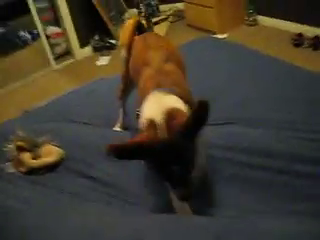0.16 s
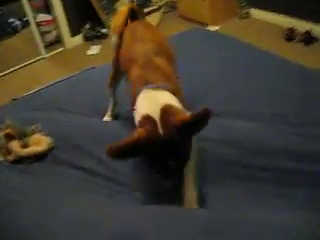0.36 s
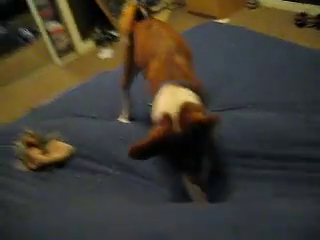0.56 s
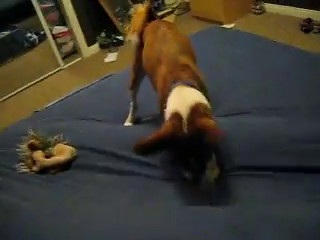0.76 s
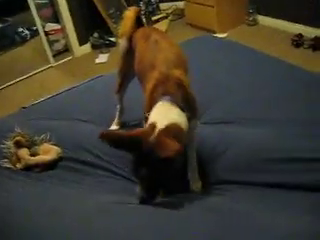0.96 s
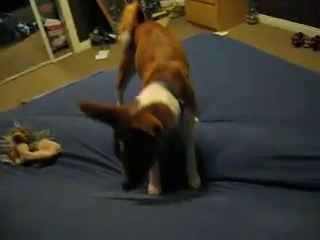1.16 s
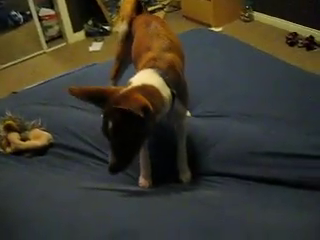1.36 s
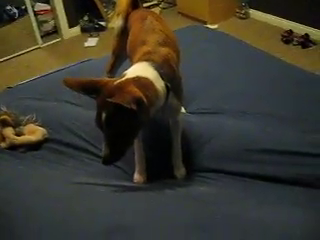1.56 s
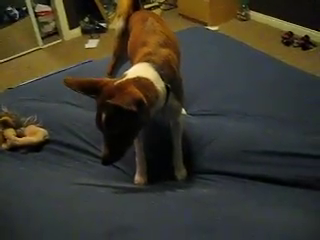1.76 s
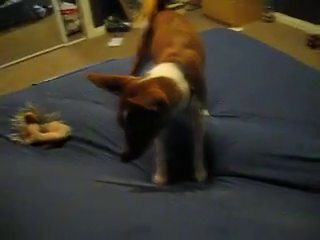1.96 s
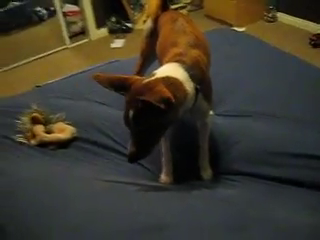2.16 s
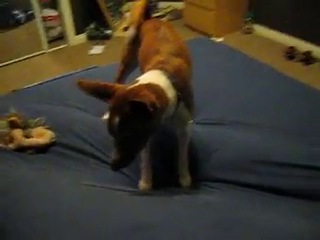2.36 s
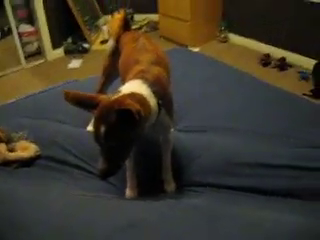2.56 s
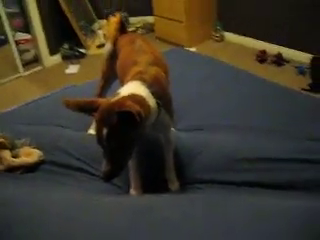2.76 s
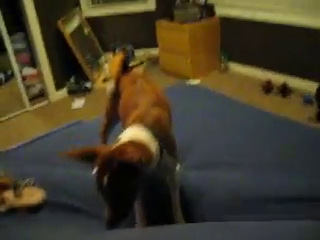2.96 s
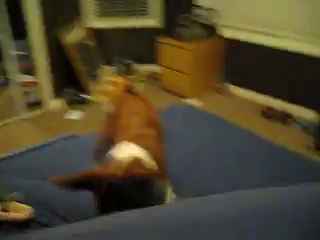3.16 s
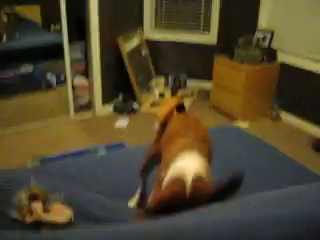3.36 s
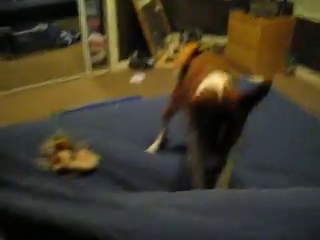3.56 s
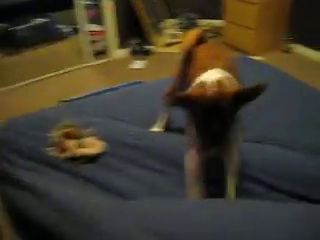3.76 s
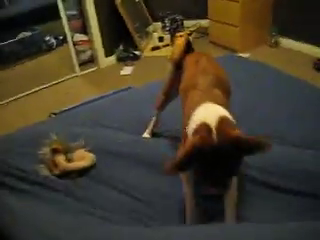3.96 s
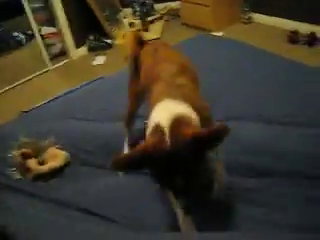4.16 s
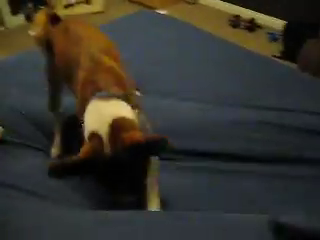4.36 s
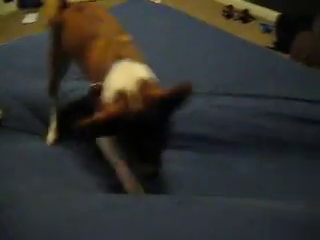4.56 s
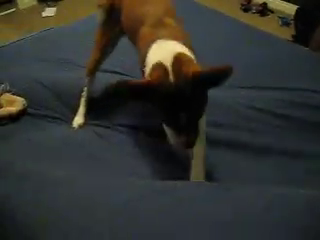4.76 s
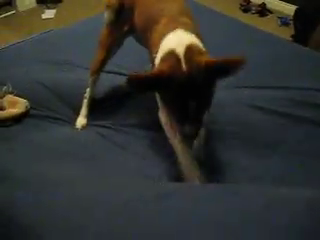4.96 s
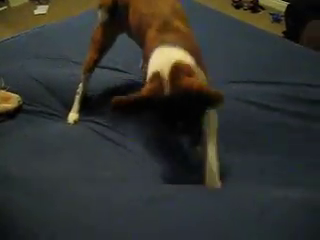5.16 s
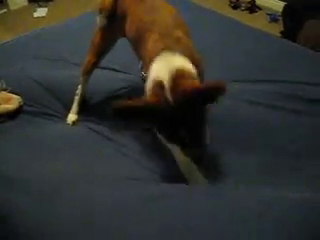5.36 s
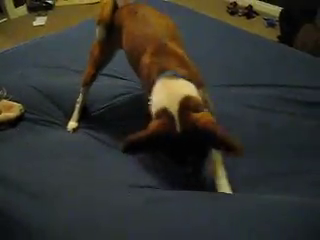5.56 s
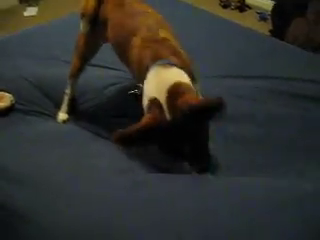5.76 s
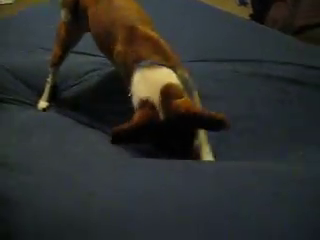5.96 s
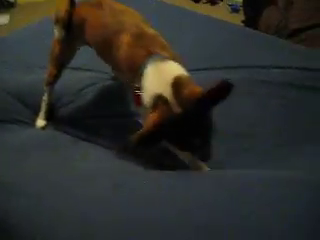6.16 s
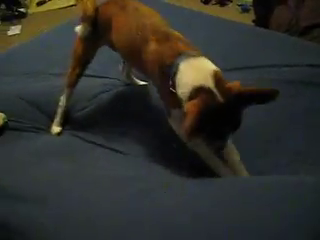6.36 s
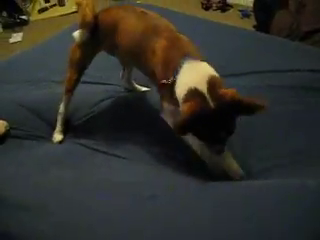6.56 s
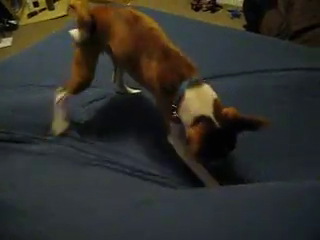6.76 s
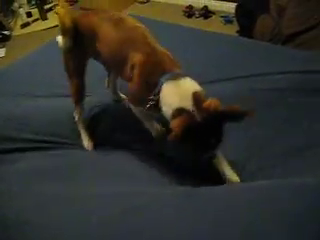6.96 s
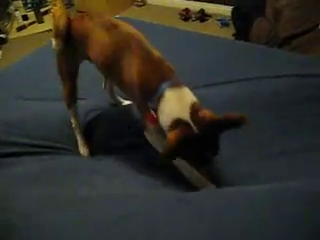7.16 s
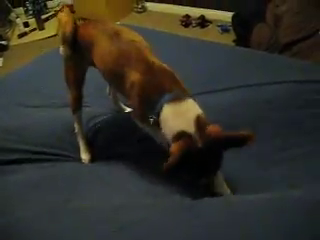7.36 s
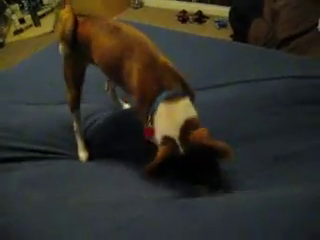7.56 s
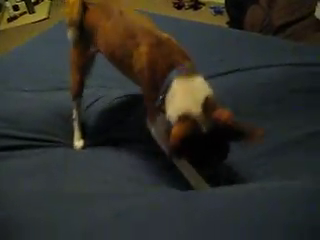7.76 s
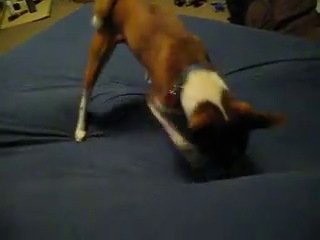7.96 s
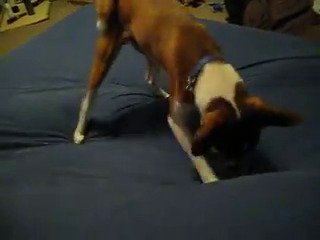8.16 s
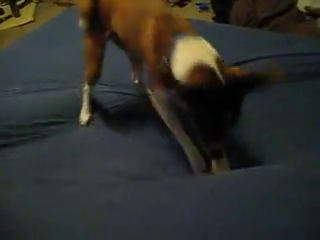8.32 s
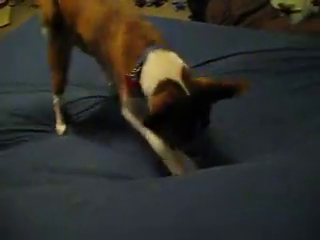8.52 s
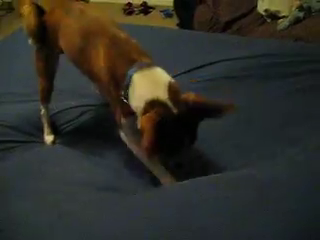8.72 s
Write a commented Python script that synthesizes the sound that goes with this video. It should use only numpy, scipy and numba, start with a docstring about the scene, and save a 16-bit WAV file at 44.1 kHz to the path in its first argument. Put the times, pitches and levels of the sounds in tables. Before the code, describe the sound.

A dog scratches rapidly at bedding, claws zipping over the weave and collar tags clinking, pauses for a hard knock, then digs on.

```python
"""A dog digs at a blanket on a mattress, close to a small camera in a quiet bedroom.
Claws zip over the weave: bands of noise whose pitch follows paw speed. The cloth adds noise as hiss, scrape and rumble.
Metal collar tags clink as sets of fading tones, and threads snag and paws thump as short rings.
Runs of small dull contacts clatter or rub. In a pause the camera is knocked twice and cloth slides near it."""
import sys
import numpy as np
from scipy import signal
from scipy.fft import rfft, irfft, next_fast_len
from scipy.io import wavfile
from scipy.ndimage import uniform_filter1d
from numba import njit

SR = 44100
rng = np.random.default_rng(int(sys.argv[2]) if len(sys.argv) > 2 else 0)


def unload_audio(sound):
    """Save the sound as a 16-bit wav file, at the path given as the first command line argument."""
    columns = np.transpose(np.atleast_2d(sound))
    # keep every value between -1 and 1, then stretch to whole-number steps
    steps = np.round(np.clip(columns, -1, 1) * 32767)
    wavfile.write(sys.argv[1], SR, steps.astype(np.int16))


N = 387638  # length of the scene [samples]

# Paw strokes; the cloth times are stretched separately for each cloth layer:
# (start [s], speeding-up time [s], zip length [s], top zip pitch [Hz], last zip pitch [Hz], zip level [dB],
#  cloth swell [s], hold [s], fade [s], fine hiss level [dB], scrape level [dB], rumble level [dB])
STROKES = [(0.021, 0.0466, .2, 4730, 3450, -37, 0.062, 0.023, 0.096, -37.5, -31.5, -43),
           (0.22, 0.066, 0.13, 5680, 4300, -29.5, 0.058, 0.0099, .14, -39, -31.5, -41),
           (0.456, 0.057, 0.16, 4120, 3500, -45, 0.064, .005, .11, -36, -33, -46),
           (0.653, 0.107, 0.11, 5740, 5500, -30.5, 0.086, .005, 0.15, -38, -35.5, -42.5),
           (3.284, 0.088, 0.16, 4600, 4500, -41, 0.056, 0.067, 0.057, -47, -34, -43),
           (3.442, 0.086, .13, 6400, 5570, -34, 0.063, 0.0088, 0.31, -42.5, -36.5, -41),
           (3.874, 0.064, 0.13, 6460, 5530, -32, 0.044, 0.044, .09, -39.5, -36, -42.5),
           (4.032, 0.05, 0.12, 5700, 5140, -33, 0.049, 0.053, 0.077, -40, -36.5, -37.5),
           (4.215, 0.064, .12, 6950, 5500, -33.5, 0.05, 0.026, 0.094, -39.5, -30, -37),
           (4.395, .042, 0.13, 4700, 4500, -35, 0.038, 0.018, .26, -42, -37, -41),
           (4.613, 0.069, 0.19, 6250, 4000, -29, 0.078, .005, .09, -38, -31.5, -39),
           (4.82, 0.035, .21, 4730, 4300, -37.5, 0.072, 0.011, 0.11, -39, -38.5, -42),
           (5.031, 0.069, .18, 6800, 3800, -28, 0.062, .045, 0.086, -39, -33, -40.5),
           (5.277, .035, 0.067, 6040, 5000, -40, 0.039, 0.039, 0.054, -39, -42, -39),
           (5.436, 0.11, 0.16, 5670, 4500, -34.5, 0.065, 0.0045, .11, -40, -26.5, -39.5),
           (5.623, 0.065, 0.17, 4960, 4600, -35, 0.036, 0.069, .09, -43.5, -40, -46),
           (5.838, 0.059, 0.13, 6200, 5970, -31.5, 0.028, 0.04, 0.082, -42, -32, -41.5),
           (6.031, 0.081, 0.16, 5460, 5000, -38.5, 0.078, .005, 0.096, -39.5, -35.5, -41.5),
           (6.27, 0.06, 0.21, 4200, 3000, -33, 0.043, 0.095, 0.11, -43, -37, -40),
           (6.505, 0.042, .12, 5100, 4520, -39.5, 0.048, 0.046, 0.095, -40.5, -39, -46),
           (6.738, .025, 0.04, 3700, 3770, -48, 0.027, .01, .04, -50, -50, -48.5),
           (6.779, 0.053, 0.15, 3570, 4030, -36.5, .047, 0.093, 0.09, -40, -35.5, -39.5),
           (7.035, .037, 0.19, 5530, 1800, -42, 0.064, 0.0085, 0.1, -37, -36.5, -46),
           (7.258, 0.036, 0.072, 5470, 5950, -38, 0.054, .005, 0.13, -37, -32, -37.5),
           (7.496, 0.047, 0.046, 5000, 5000, -46, 0.064, .005, 0.071, -41.5, -36.5, -49),
           (7.733, .04, .08, 5600, 5100, -39, 0.044, .03, .1, -41, -33.5, -44.5),
           (8.002, 0.047, .13, 4950, 4500, -35.5, 0.05, .005, 0.12, -41, -37, -40),
           (8.217, .075, 0.14, 4760, 4600, -36.5, 0.051, .01, 0.14, -42.5, -34, -44.5),
           (8.467, 0.0645, 0.12, 4400, 4330, -36.5, 0.064, .01, .14, -39.5, -38, -41.5),
           (8.708, 0.0535, 0.092, 4940, 4850, -30.5, .03, 0.051, .1, -41, -36, -36)]


def undb(db):
    """Turn decibels into a gain."""
    return 10 ** (np.asarray(db) / 20)


def band_level(x, lo_hz, hi_hz):
    """Scale a sound so that its part inside a band has rms 1."""
    band_filter = signal.butter(4, [lo_hz, hi_hz], "band", fs=SR, output="sos")
    part = signal.sosfilt(band_filter, x)
    return x / np.sqrt(np.mean(part ** 2))


def colour(x, points):
    """Filter a sound with the gain curve drawn through (frequency [Hz], level [dB]) points."""
    size = next_fast_len(N)
    hz, db = np.transpose(points)
    bin_hz = np.arange(size // 2 + 1) * SR / size
    gain = undb(np.interp(np.log(bin_hz + 1), np.log(hz), db))  # + 1 avoids log(0)
    return irfft(rfft(x, size) * gain, size)[:N]


@njit
def svf(x, hz, q):
    """Filter with a moving centre: returns the band round it (gain 1) and what lies below it."""
    band, low = np.empty(len(x)), np.empty(len(x))
    b, l = 0., 0.  # the filter's two memories
    for i in range(len(x)):
        g = np.tan(np.pi * hz[i] / SR)
        v = (b + g * (x[i] - l)) / (1 + g * (g + 1 / q))
        band[i] = v / q
        low[i] = l + g * v
        b, l = 2 * v - b, l + 2 * g * v
    return band, low


def add(track, s, sound):
    """Mix a sound in at a time [s]."""
    i = int(s * SR)
    track[i:i + len(sound)] += sound[:N - i]


def decay(t, t60):
    """Fade that falls by 60 dB in t60 seconds."""
    return np.exp(-np.log(1000) * t / t60)


def ring(hz, t60, phase=0.):
    """One tone of a struck body, dying away."""
    t = np.arange(int(t60 * SR)) / SR
    return np.sin(2 * np.pi * hz * t + phase) * decay(t, t60)


def burst(noise, hz, q, t60):
    """A short decaying crack of noise round a pitch, peak 1."""
    t = np.arange(len(noise)) / SR
    x = svf(noise * decay(t, t60), np.full(len(t), 1. * hz), q)[0]
    return x / np.abs(x).max()


def blow(hz, t60):
    """A short ring of a small body, which radiates little below its pitch; peak 1."""
    x = np.append(ring(hz, t60), np.zeros(300))  # room for the filter to settle
    x = signal.lfilter(*signal.butter(2, 0.5 * hz, "high", fs=SR), x)
    return -x / np.abs(x).max()


def flicker(rate):
    """Random levels, one every 1 / rate seconds, joined by straight slides; spread near 1."""
    size = int(SR / rate)
    steps = np.repeat(rng.standard_normal(N // size + 1), size)
    return 1.16 * uniform_filter1d(steps, size)[:N]


def fibres(grain_db):
    """Dense slips of single fibres: noise whose grains differ in size."""
    size = undb(grain_db * np.minimum(rng.exponential(size=N // 16 + 1), 4.5))
    x = rng.standard_normal(N) * np.repeat(size, 16)[:N]  # 16 samples a grain
    return x / x.std()


def patchy(x, patchy_db, rate):
    """Each half octave flickers alone, as claws catch and lose different threads."""
    out = np.zeros(N)
    for hz in 250 * 2 ** np.arange(0, 5.6, .5):
        out += undb(patchy_db * flicker(rate)) * svf(x, np.full(N, hz), 2.5)[0]
    return out


def room():
    """Still air and microphone hiss: steady noise, strongest in the bass."""
    # Spectrum of the quiet room: (frequency [Hz], level per Hz [dB])
    room_spectrum = [(15, -23), (35, -6.5), (70, -2.5), (110, -3), (150, -3), (330, -6.5), (500, -10),
                     (900, -4), (1500, -12.5), (3000, -14), (6000, -20), (9000, -25), (11000, -24),
                     (13500, -32), (16500, -38)]
    room_db = -50.5
    x = colour(rng.standard_normal(N), room_spectrum)
    return undb(room_db) * x / x.std()


def rattles():
    """Uneven runs of small contacts, each ringing one heavily damped resonance."""
    # Quick runs of small dull contacts: clatter of tags or strap, and one rub of cloth:
    # (start [s], length [s], pitch [Hz], ring t60 [s], level at start [dB], level at end [dB])
    contact_runs = [(2.365, 0.048, 2270, 0.0055, -38, -30), (1.921, 0.031, 3600, 0.0034, -51, -38),
                    (2.424, 0.15, 3340, 0.0023, -48, -45), (2.615, 0.029, 1300, 0.0047, -49, -47),
                    (4.345, 0.14, 4650, 0.0049, -23.5, -45), (5.945, 0.11, 4620, 0.004, -31, -45),
                    (6.344, 0.1, 3500, 0.0054, -33, -52)]
    hits_per_s = 1100  # on average
    out = np.zeros(N)
    for s, length, hz, t60, start_db, end_db in contact_runs:
        size = int(length * SR)
        struck = rng.random(size) < hits_per_s / SR
        hits = struck * (rng.random(size) - .5)
        hits = hits / hits.std() * undb(np.linspace(start_db, end_db, size))
        body = np.convolve(ring(hz, t60), ring(hz, 0.4 * t60))
        body = body / np.sqrt(np.sum(body ** 2))
        add(out, s, np.convolve(hits, body))
    return out


def thumps():
    """Soft blows: a cycle or two of the padded body, with a harder overtone."""
    # Paw thumps on the mattress and knocks on the camera: (time [s], main peak level [dB], pitch [Hz])
    soft_blows = [(0.592, -29, 514), (2.086, -22, 164), (2.0994, -22, 85.6), (2.099, -23, 146),
                  (2.1012, -10.5, 467), (2.4053, -16, 835), (2.412, -23, 810), (2.673, -25, 207),
                  (2.7376, -27.5, 480), (2.7743, -26.5, 248), (2.7978, -27, 304), (2.891, -24.5, 330),
                  (2.898, -28, 300), (3.0355, -29.5, 206), (4.282, -28, 540), (4.471, -19.5, 308),
                  (4.6815, -20, 322), (4.8675, -32, 418), (5.211, -32.5, 130), (5.665, -30, 252),
                  (6.392, -33, 470), (6.562, -37, 226), (6.848, -26, 506), (6.9345, -29, 570),
                  (7.2722, -24.5, 556), (8.078, -28, 277), (8.5835, -31, 445)]
    out = np.zeros(N)
    for s, db, hz in soft_blows:
        add(out, s, undb(db) * blow(hz, 4.3 / hz))
        add(out, s, undb(db - 7.5) * blow(2.17 * hz, 3.0 / hz))
    return out


def snaps():
    """A few cycles of a small stiff body, with a treble crack of noise."""
    # Claws snagging a thread and hard taps; the ring takes 1.53 times the listed cycles to fall 60 dB:
    # (time [s], ring peak level [dB], pitch [Hz], ring length [cycles], crack peak level [dB])
    hard_taps = [(0.4438, -3.5, 1630, 7.8, -7), (0.4441, -2, 3700, 8.7, -3), (0.505, -13.5, 2410, 5.7, -21),
                 (.5047, -5, 7400, 13, -14), (.7768, -22, 1400, 1.7, -11), (1.8837, -19, 2120, 6, -42),
                 (1.8827, -28, 4000, 5, -45), (1.919, -21.5, 2170, 4.6, -38),
                 (2.0853, -16, 1110, 0.57, -36), (2.0878, -13.5, 776, 1.6, -24),
                 (2.0998, -17, 1130, 0.54, -17.5), (2.683, -50, 9000, 2, -33),
                 (2.4051, -8.5, 1760, 2.3, -31), (4.337, -11, 4560, 20, -13.5),
                 (4.6338, -15, 2210, 2.3, -9), (5.6912, -5, 6450, 7.1, -27),
                 (5.9345, -16.5, 4000, 8.4, -32), (6.333, -9.5, 3820, 4, -22), (7.129, -16, 2000, 1.9, -34),
                 (7.1476, -13, 2980, 1.4, -34), (7.1562, -13.5, 1400, 1.1, -38), (7.272, -24, 980, 10, -36),
                 (5.811, -27, 980, 5, -42), (5.845, -24, 895, 4.5, -45), (7.72, -27.5, 684, 5.1, -42),
                 (8.71, -23, 849.7, 6, -44)]
    out = np.zeros(N)
    for s, db, hz, cycles, crack_db in hard_taps:
        noise = rng.standard_normal(500)
        add(out, s, undb(db) * blow(hz, 1.53 * cycles / hz))
        add(out, s, undb(crack_db) * burst(noise, 6500, 0.25, 0.011))
    return out


def tags():
    """Each clink starts every tone of the metal afresh, with a tick; close pairs of tones beat."""
    # Tags meeting; t60 is that of the 10.8 kHz ring, short when fur damps the tags:
    # (time [s], 10.8 kHz ring level [dB], then relative to it: 14.8 kHz ring [dB], 7.0 kHz ring [dB],
    #  6.4 kHz ring [dB], tick before a shared boost [dB]; t60 [s])
    clinks = [(0.059, -19.5, -33, -28, -25, -13, 0.12), (0.8, -29, -25, -23, -24, -8, 0.18),
              (0.9157, -9, -39, -30, -17, -24, 0.14), (0.9846, -23, -41, -24, -14, -23, 0.12),
              (1.0529, -29.5, -26, -17, -6, -5, 0.14), (3.2868, -30.5, -17, -24, -8, -8, 0.18),
              (3.3815, -26, -43, -14, -8, -23, 0.15), (4.3357, -21, -23, -27, -26, 6, 0.15),
              (4.3963, -30.5, -23, -23, -20, -5, 0.18), (4.469, -28, -30, -20, -17, -9, 0.18),
              (4.58, -26, -29, -31, -26, -14, 0.08), (4.6336, -12.5, -30, -13, -14, -23, 0.11),
              (5.2329, -35, -21, -29, -25, -13, 0.12), (5.4405, -37, 5, -17, -12, -6, 0.18),
              (5.4818, -29, -25, -21, -18, -6, 0.18), (5.5262, -19.5, -31, -23, -22, -4, 0.13),
              (5.5532, -23, -24, -17, -21, -18, 0.24), (5.691, -12, -30, -13, -21, -5, 0.13),
              (5.7307, -14, -27, -13, -32, -11, 0.12), (5.8745, -29, -24, -11, 0, -6, 0.18),
              (5.9222, -10, -16, -31, -26, -4, 0.24), (6.111, -23.5, -14, -17, -7, -9, 0.18),
              (6.2845, -31, 1, -20, -13, -5, 0.14), (6.332, -19.5, -24, -8.5, -13, -16, 0.17),
              (6.3583, -21.5, -29, -21, -18, -14, 0.1), (6.543, -15, -38, -21, -17, -23, 0.11),
              (6.686, -33.5, -20, -25, -25, -8, 0.1), (6.8193, -26.5, -19, -22, -10, -8, 0.13),
              (6.978, -39, -25, -25, -25, -16, 0.15), (7.2778, -39, -21, -14, -12, -4, 0.18),
              (7.3222, -22, -31, -14, -16, -12, 0.18), (7.551, -16, -14, -35, -20, -24, 0.16),
              (7.824, -29, -25, -25, -25, -16, 0.092), (7.909, -31, -4, -26, -16, -12, 0.14),
              (8.334, -25.5, -30, -34, -25, -16, 0.23), (8.4085, -12, -15, -45, -16, -16, 0.14)]
    # Tones of the tags, in close pairs:
    # (pitch [Hz], partner pitch [Hz], partner level [dB], ring time relative to the first pair [ratio])
    tag_tones = [(10745, 10795, -3, 1), (14745, 14790, -5, .6), (7020, 7050, -9, 1.1),
                 (6340, 6400, -2, .65)]
    detune_hz = 30  # each clink's tones are detuned at random; full range
    tick_boost_db = 7.5
    out = np.zeros(N)
    for s, db, *shares, tick_db, t60 in clinks:
        for (hz, pair_hz, pair_db, life), share_db in zip(tag_tones, [0] + shares):
            chance, detune, pair_detune = rng.random(3) - .5
            pair_gain = undb(pair_db)
            tone = ring(hz + detune_hz * detune, life * t60)
            # the random phase lets the beat start anywhere within a range
            partner = ring(pair_hz + detune_hz * pair_detune, life * t60, 2.3 * chance)
            beat = (tone + pair_gain * partner) / (1 + pair_gain)
            add(out, s, undb(db + share_db) * beat)
        tick = burst(rng.standard_normal(400), 11300, 1.3, 0.0036)
        add(out, s, undb(db + tick_db + tick_boost_db) * tick)
    return out


def dragging():
    """Gains of hiss, scrape and rumble: each movement swells, holds and fades over the settling folds."""
    # Cloth sliding without claws; times are stretched separately for each layer:
    # (start [s], swell [s], hold [s], fade [s], fine hiss level [dB], scrape level [dB], rumble level [dB])
    slides = [(0.575, 0.045, 0.053, 0.069, -47.5, -41.5, -45.5), (0.916, 0.034, .05, .06, -55.5, -53, -59),
              (1.038, .03, .01, 0.087, -53, -57, -59), (1.889, .035, 0.028, 0.0047, -41, -44, -50),
              (2.113, 0.1, 0.19, 0.096, -42, -42.5, -54), (2.423, 0.033, .11, .03, -50.5, -54, -66),
              (3.056, .18, .02, 0.38, -46.5, -40.5, -43), (3.73, 0.062, 0.0044, 0.06, -52, -44, -47),
              (5.81, .012, .005, .03, -54, -35.5, -49), (6.4, .03, .01, .07, -45, -37.5, -47),
              (7.13, .025, .01, .07, -50, -32, -38), (6.236, 0.043, 0.022, .05, -60, -52, -42),
              (7.413, 0.064, 0.064, 0.076, -46.5, -40.5, -53), (7.697, 0.035, .01, .05, -48, -54, -47),
              (7.902, 0.035, 0.036, 0.088, -60, -49, -48.5), (8.4, 0.038, .04, .05, -56, -47, -55)]
    # Folds settling between strokes: (time [s], fine hiss level [dB], scrape level [dB], rumble level [dB])
    settling = [(0, -59, -50, -45), (.2, -68, -59, -49.5), (.9, -62, -54, -54), (1.17, -70, -85, -55.5),
                (1.84, -80, -74, -54), (1.99, -72, -62, -59), (2.09, -56.5, -57, -44.5),
                (2.6, -60.5, -51.5, -46.5), (3.01, -56.5, -58, -48.5), (3.6, -60, -46.5, -44.5),
                (4.6, -50, -44, -45), (5.0, -60.5, -51.5, -52.5), (5.8, -54.5, -52, -48),
                (6.7, -56.5, -57, -49.5), (7.65, -58, -52, -52), (8.2, -57.5, -57, -48.5),
                (8.79, -71, -58, -51)]
    # How hiss, scrape and rumble (one row each) follow a movement:
    # (lead [s], swell time share [ratio], hold share [ratio], fade time share [ratio],
    #  swell curve [exponent], fade curve [exponent])
    follows = [(.002, 1, 0.99, 0.85, 1.67, 1.33), (0.011, 0.76, 0.53, 1.17, 1.83, 0.95),
               (.03, 0.86, .9, 1.64, 1.37, 1.03)]
    edge_db = 20  # a swell starts, and a fade ends, this far under the hold level
    t = np.arange(0, N, 32) / SR  # every 32nd sample is fine enough
    s, *columns = np.transpose(settling)
    power = [undb(2 * np.interp(t, s, levels)) for levels in columns]  # twice the dB gives power
    movements = [(row[0], *row[6:]) for row in STROKES] + slides
    for start, swell, hold, fade, *levels in movements:
        for k, (db, follow) in enumerate(zip(levels, follows)):
            lead, swell_share, hold_share, fade_share, swell_curve, fade_curve = follow
            top = start + swell_share * swell
            hold_end = top + hold_share * abs(hold)
            before = np.maximum(top - t, 0) / (lead + swell_share * swell)
            after = np.maximum(t - hold_end, 0) / (fade_share * fade)
            drop_db = edge_db * (before ** swell_curve + after ** fade_curve)
            power[k] = power[k] + undb(2 * (db - drop_db))
    return [np.interp(np.arange(N) / SR, t, np.sqrt(p)) for p in power]


def strokes():
    """Pitch of threads passing a claw (it follows paw speed) and loudness of the zip."""
    t = np.arange(N) / SR
    marks, zip_gain = [], np.zeros(N)
    for s, rise, length, top_hz, end_hz, db, *_ in STROKES:
        marks += [(s - .035, 4600), (s, 550), (s + 0.68 * rise, 0.812 * top_hz),
                  (s + rise, top_hz), (s + length, end_hz)]
        times = [s, s + 0.23 * rise, s + 0.94 * rise, s + 1.33 * rise, s + length]
        zip_gain += undb(db) * np.interp(t, times, [0, 0.43, 0.88, 0.59, 0.0023])
    s, hz = np.transpose(sorted(marks))
    return np.clip(np.interp(t, s, hz), 300, 7500), zip_gain


def cloth():
    """A narrow zip at the thread rate, scrape below it, fine hiss above and the rumble of the folds."""
    # Spectrum of the fine hiss: (frequency [Hz], level per Hz [dB])
    hiss_spectrum = [(1200, -34), (2500, -1), (5000, -2), (7000, -5.5), (9100, -4), (11400, 3), (13000, -5),
                     (14800, -18), (16500, -23)]
    # Spectrum of the scrape: (frequency [Hz], level per Hz [dB])
    scrape_spectrum = [(400, -15), (900, 0.5), (1500, -1.5), (3000, -2.5), (5000, -2), (7500, 3),
                       (9500, -40)]
    zip_q = 6.5  # sharpness of each of the two filters that shape the zip
    hiss_gain, scrape_gain, rumble_gain = dragging()
    hz, zip_gain = strokes()

    zips = np.zeros(N)
    for speed, db in [(0.99, -0.5), (0.768, -4)]:  # the second claw trails, slower
        wobble_hz = speed * hz * (1 + 0.035 * flicker(45))
        band = svf(fibres(grain_db=1.5), wobble_hz, zip_q)[0]
        band = svf(band, wobble_hz, zip_q)[0]
        even_out = np.sqrt(3000 / hz)  # bands widen with pitch
        zips += undb(db + 2.2 * flicker(70)) * even_out * band
    zips = zips / zips.std()

    scrape = colour(fibres(grain_db=1.5), scrape_spectrum)
    scrape = patchy(scrape, patchy_db=3.5, rate=55)
    for q in (.55, .8, 1.5):
        scrape = svf(scrape, 1.2 * hz, q)[1]  # a slow paw makes little treble
    scrape = band_level(scrape, 1000, 9300)

    hiss = band_level(colour(fibres(grain_db=1.67), hiss_spectrum), 11510, 13300)

    rumble = colour(fibres(grain_db=2.5), [(20, -3.5), (40, -6.5), (90, -8.5), (150, -0.5), (300, 2),
                                           (1000, -2.5), (2000, -7), (4000, -24.0)])
    rumble = band_level(rumble * undb(2.2 * flicker(30)), 140, 1360)
    return zip_gain * zips + scrape_gain * scrape + hiss_gain * hiss + rumble_gain * rumble


def scene():
    """Mix all sources; hard sounds get a short noise tail from the soft room."""
    hard = tags() + snaps() + thumps() + rattles()
    t = np.arange(SR // 5) / SR
    tail = rng.standard_normal(len(t)) * decay(t, 0.064) * (t > .003)
    tail = svf(tail, np.full(len(t), 2500.), 0.65)[1]  # bedding swallows the treble
    hard = hard + undb(-34.5) * signal.fftconvolve(hard, tail)[:N]
    return (cloth() + hard + room())[None]


def record(dry):
    """The camera rounds loud peaks, notches a narrow band, lowers the high treble and cuts the top."""
    notch_hz, shelf_hz, top_hz = 7885, 15800, 16730
    x = np.tanh(0.99 * dry) / 1.213  # the loudest peaks are rounded
    for q in (6.5, 30.):  # a wide notch, then a narrow one
        x = signal.lfilter(*signal.iirnotch(notch_hz, q, SR), x)
    low = signal.sosfiltfilt(signal.ellip(8, .1, 50, shelf_hz, fs=SR, output="sos"), x)
    x = low + undb(-30) * (x - low)
    return signal.sosfilt(signal.ellip(10, .2, 70, top_hz, fs=SR, output="sos"), x)


dry = scene()
out = record(dry)
unload_audio(out)
```